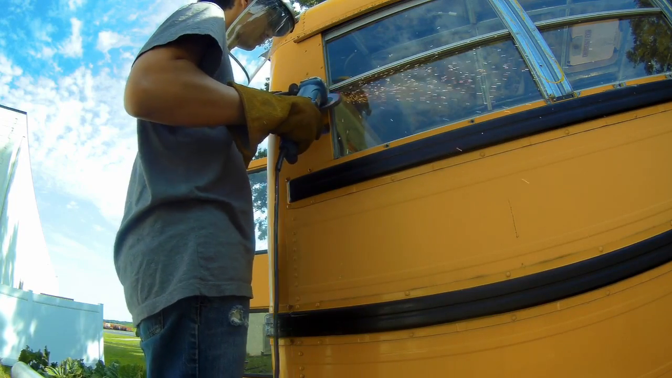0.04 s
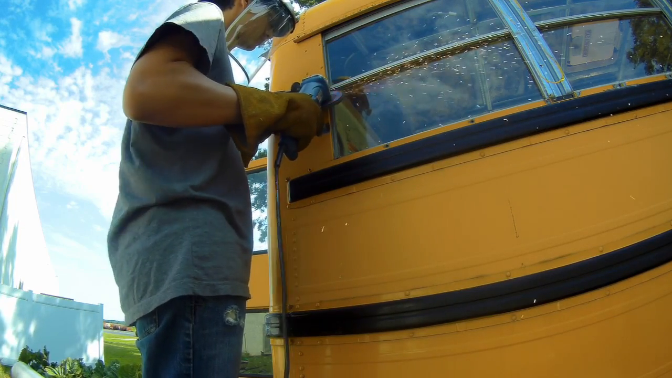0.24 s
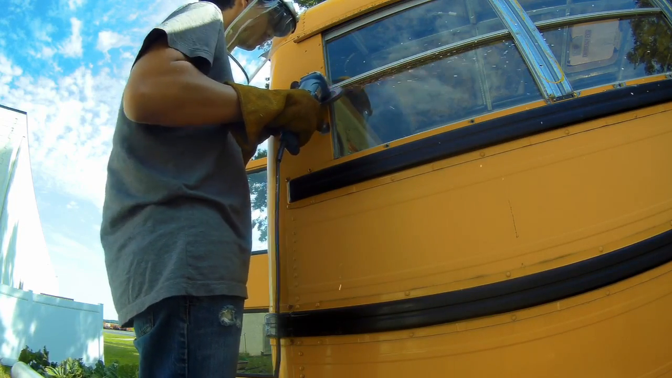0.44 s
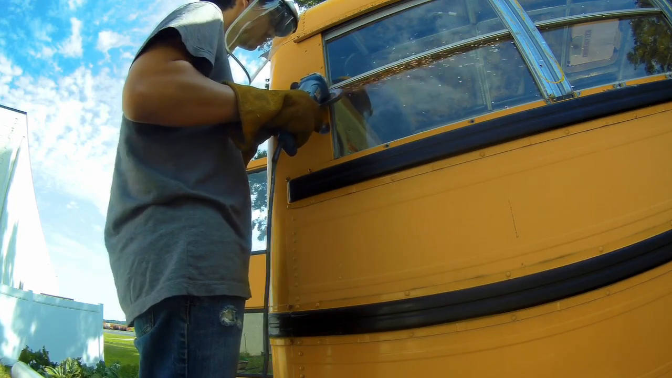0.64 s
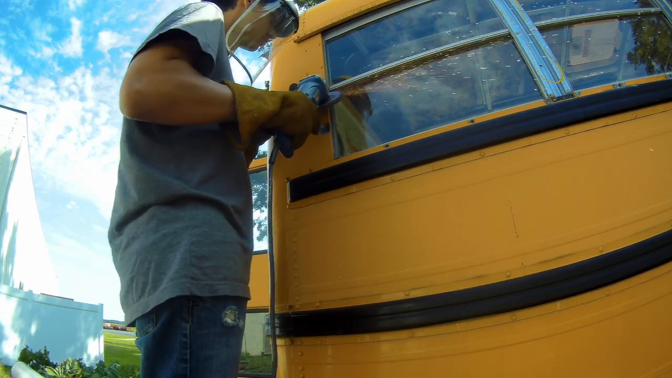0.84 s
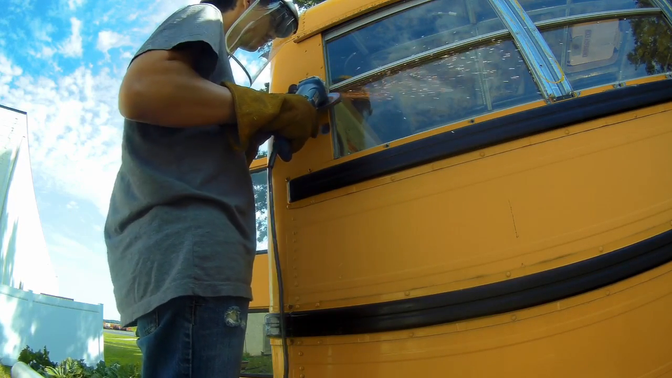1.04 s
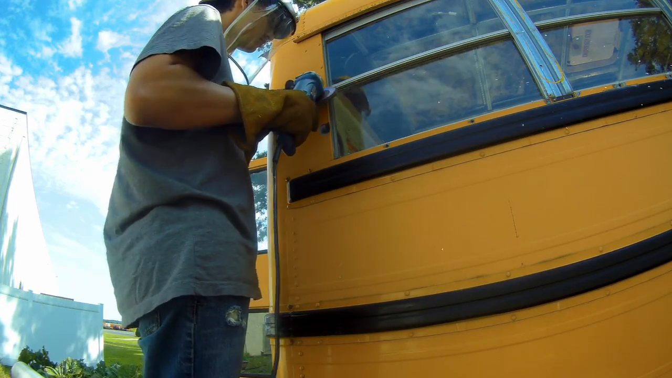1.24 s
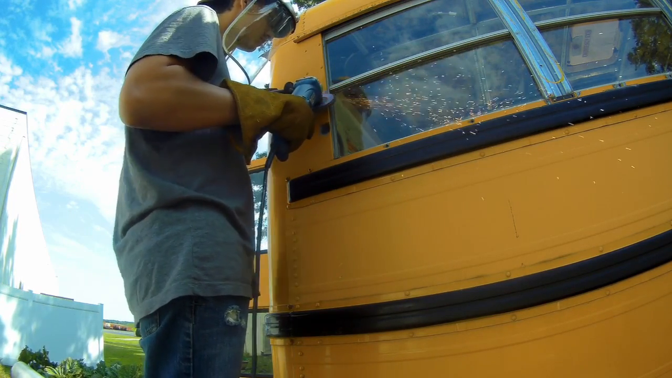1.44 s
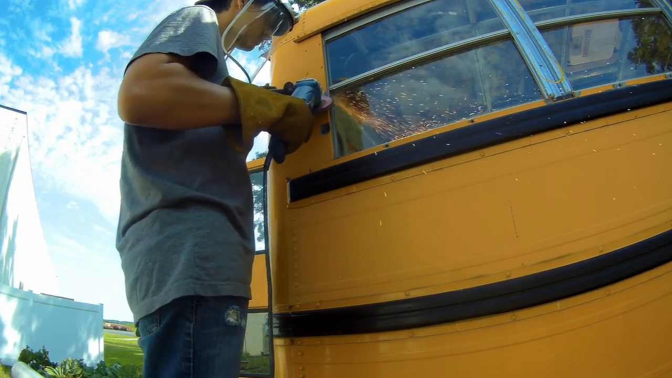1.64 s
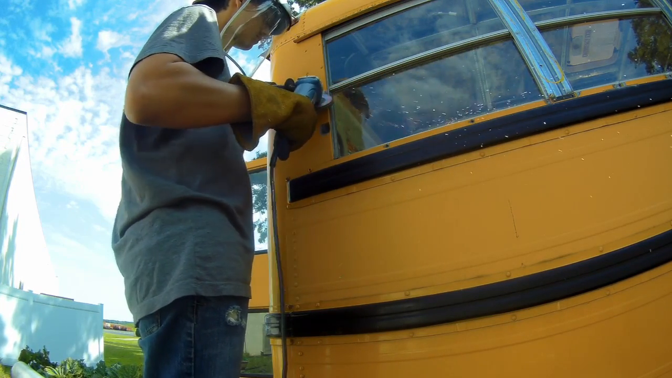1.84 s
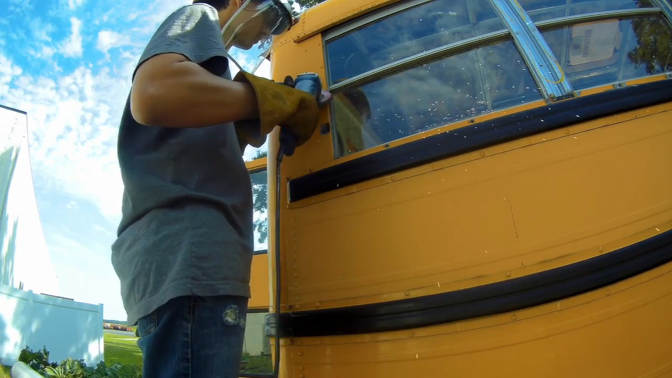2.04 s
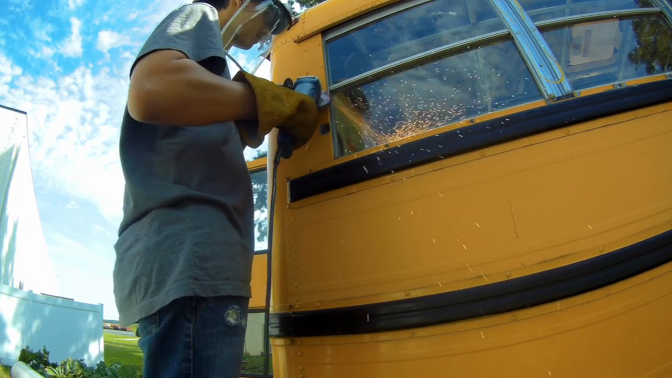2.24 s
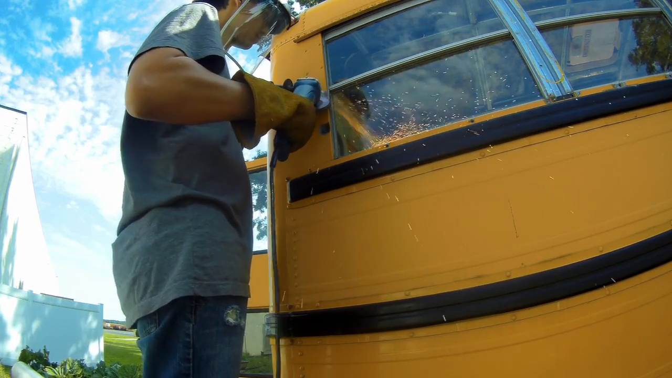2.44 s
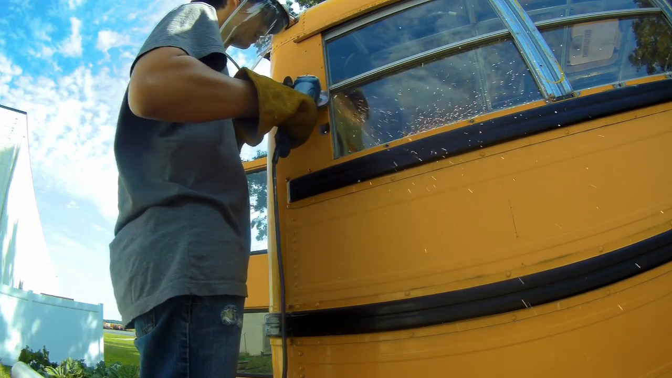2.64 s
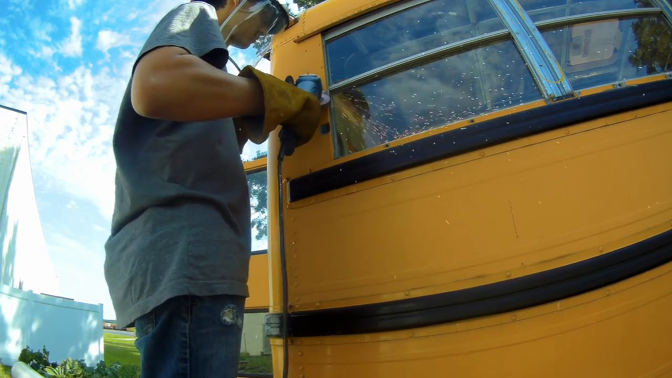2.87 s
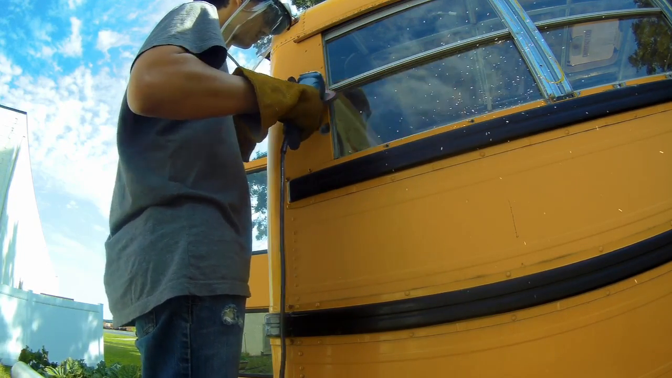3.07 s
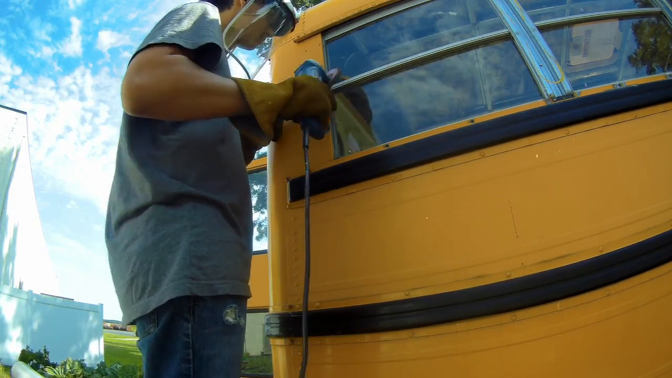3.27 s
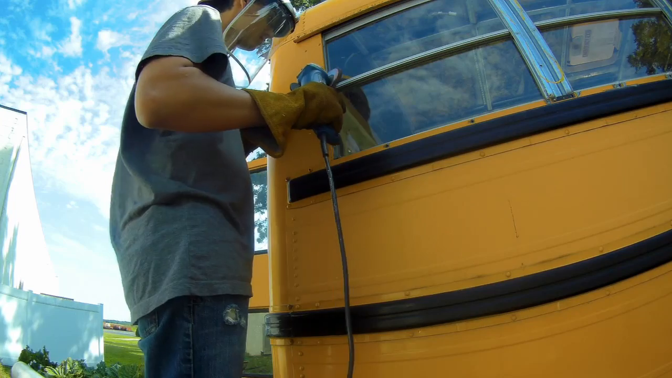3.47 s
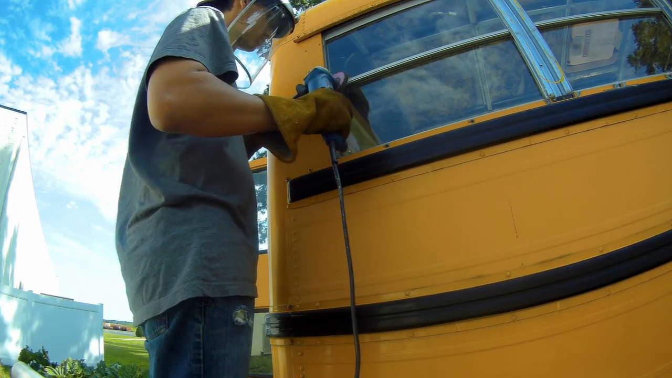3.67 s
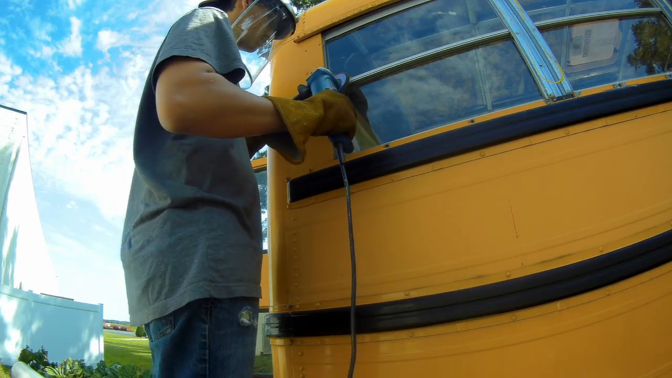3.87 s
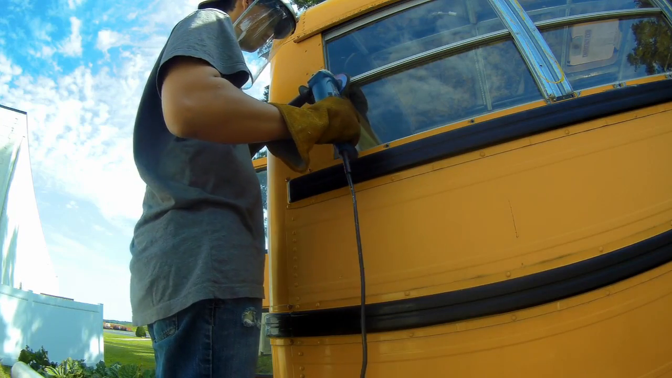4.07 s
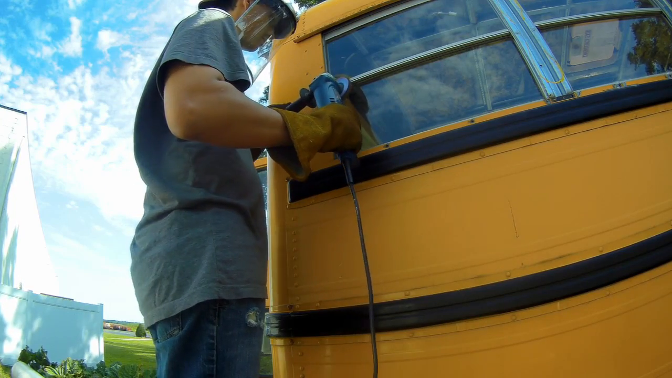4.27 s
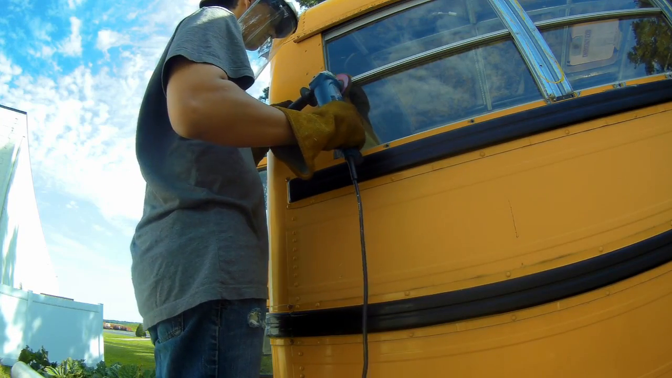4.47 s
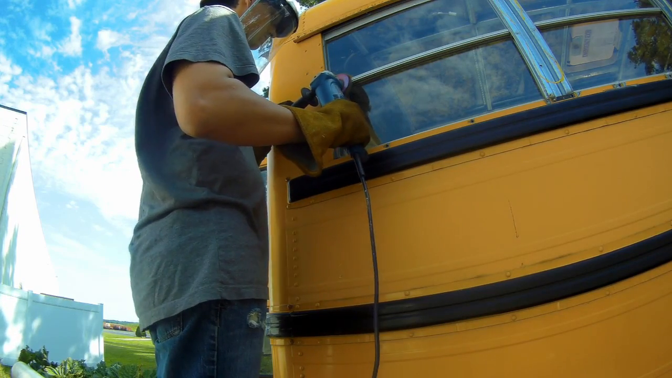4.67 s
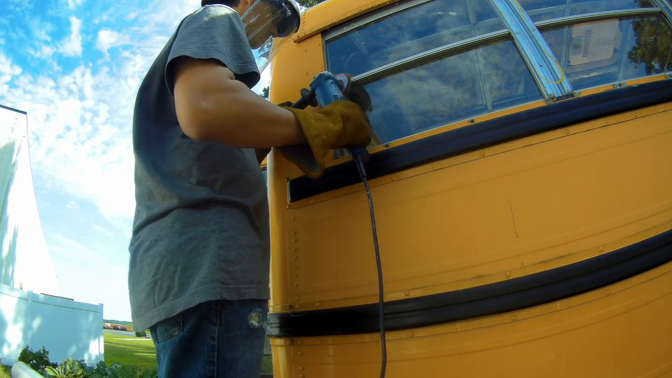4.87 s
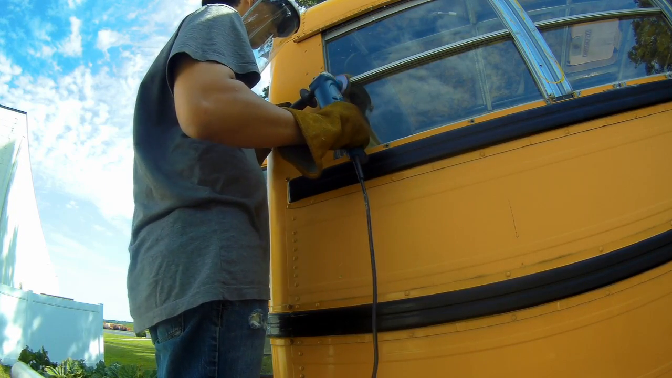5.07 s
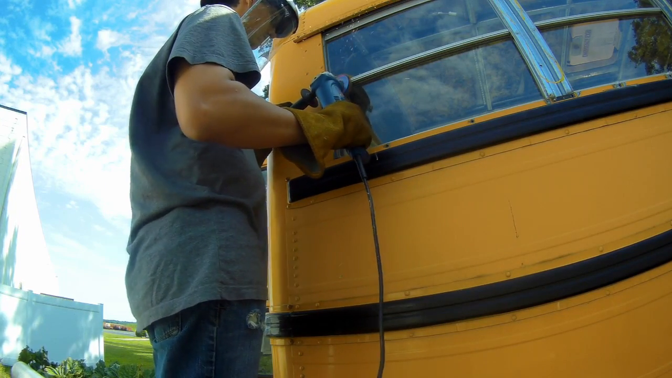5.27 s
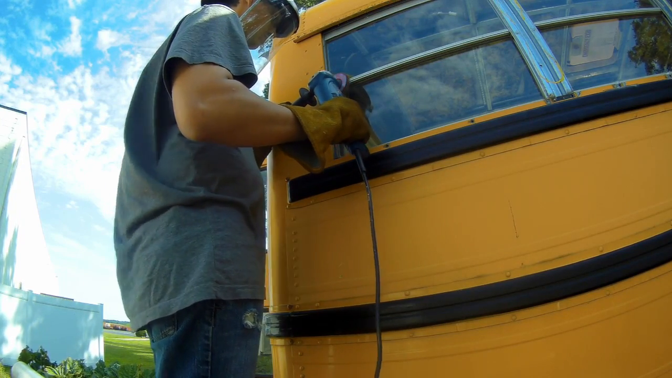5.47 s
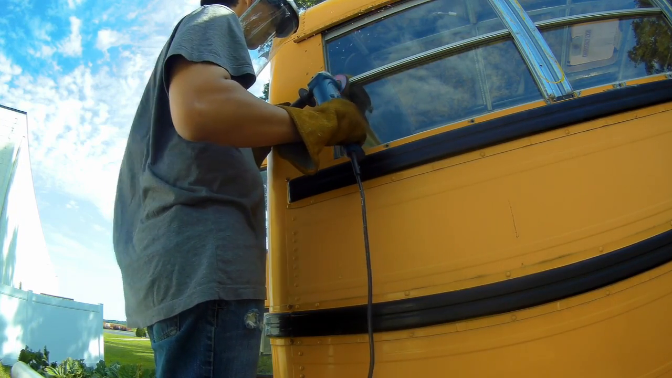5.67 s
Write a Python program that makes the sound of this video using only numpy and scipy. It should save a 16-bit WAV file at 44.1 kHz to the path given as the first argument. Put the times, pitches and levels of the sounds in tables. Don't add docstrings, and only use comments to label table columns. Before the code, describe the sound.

Outdoors, very close to a small microphone, an angle grinder is already cutting steel. From 0 to 3.1 s it makes a continuous harsh, high, sizzling grind, the motor dragged down at the start, with a rough whine and thin sheet-metal ring. The pressure flickers as edges catch, notably around 1.3, 2.1 and 2.4 s, with dull panel jolts underneath. At about 3.1 s the disc lifts and the noise drops sharply to a much quieter whir: the motor climbs in pitch, vents hiss and loose gears clack. From 3.9 to 4.5 s the disc skips on metal in short rasping bounces roughly a tenth of a second apart. Stronger scrapes follow at 4.7 s, then a longer push from 4.9 to 5.15 s with heavy thuds and sagging pitch. Brief strokes at 5.2 and 5.3 s lead to a final grind from 5.5 s to the end. A faint machine hums far off. Dry, centred, slightly overloaded sound.

```python
import sys
import numpy as np
from scipy import signal
from scipy.fft import rfft, irfft, next_fast_len
from scipy.io import wavfile
from scipy.ndimage import uniform_filter1d, map_coordinates

SR = 44100
rng = np.random.default_rng(int(sys.argv[2]) if len(sys.argv) > 2 else 0)


def waveform_to_disk(signal):
    frames = np.transpose(np.atleast_2d(signal))
    scaled = np.clip(frames, -1, 1) * 32767
    samples = np.round(scaled).astype(np.int16)
    wavfile.write(sys.argv[1], SR, samples)


def rack_gain(trim_db):
    fader = np.asarray(trim_db, float)
    return 10 ** (fader / 20)


N = 251811

GRIT_SPECTRUM = [(4500, -34.5), (7400, -17), (8050, -14.5), (8900, 0), (9500, 2), (10200, -6.5),
                 (10800, -13.5), (11500, -15.5), (12500, -27), (16200, -40.5)]
FIZZ_SPECTRUM = [(9000, -22), (11500, -6.5), (13000, -2), (14500, 1), (15600, 3.5), (18000, 1)]
FIRST_PANEL_SPECTRUM = [(2400, -24.5), (3100, -27.5), (3500, -13.5), (3720, -.5), (3950, -13.5),
                        (4400, -15), (5100, -17), (5800, -7.5), (6400, -1), (7400, 2.5), (8000, -6.5),
                        (10400, -38.5), (17000, -94)]
NEXT_PANEL_SPECTRUM = [(1760, -44.5), (3000, -23), (3490, -6), (4130, -6.5), (4620, -4.5), (5900, -1.5),
                       (6330, 4.5), (8000, -5.5), (10400, -23.5), (17600, -120)]
AIR_SPECTRUM = [(150, -38.5), (400, -18.5), (700, -4), (1400, -5), (2300, 0), (3000, -9), (3700, -0.5),
                (5000, -7.5), (6500, -1), (8000, -5.5), (9300, -2.5), (11000, -7.5), (16000, -20)]
SHAKE_SPECTRUM = [(15, -1), (40, -6.5), (100, -7), (300, 1), (600, 0), (1500, -5), (4000, -23)]
CLACK_SPECTRUM = [(2500, -31), (3700, -3), (4800, -7.5), (6500, 0), (8000, -2), (9300, -4.5), (11000, -11),
                  (16000, -27)]
THUD_SPECTRUM = [(20, -5), (60, -2), (130, -3), (300, -3), (700, -16), (2000, -65)]

# (frequency [Hz], level [dB rms])
HUM = [(70.0, -86.5)]
# (multiple of disc speed, level [dB re sixth order])
OTHER_ORDERS = [(2, -18.5), (4, -6), (5, -5), (7, -6), (8, -5), (9, -1.5), (10, -1)]
# (multiple of disc speed, level [dB], body note [Hz], half width [Hz], loss at full load [dB])
BODY_NOTES = [
    (1, -74, 149, 4.2, 4),
    (3, -73.5, 367, 41, 5),
    (6, -72, 868, 60, -1),
]
# (time [s], speed [turns/s])
SPEED = [(0.0, 120), (0.09, 110), (0.21, 99.7), (0.5, 98.5), (0.85, 100.3), (1.1, 98.8), (1.38, 96.3),
         (1.67, 92.4), (1.94, 95.5), (2.49, 95.7), (2.99, 100), (3.12, 101), (4.63, 95.3), (4.78, 95),
         (5.06, 84.5), (5.44, 74.5), (5.58, 76), (5.71, 70.6)]
# (time [s], drag [turns/s])
PUSHES = [(0.44, 2.64), (1.0, 2.25), (1.269, 9.9), (1.51, 8.95), (1.802, 5.2), (2.06, 6.4), (2.34, 8.5),
          (2.6, 9.4), (2.84, 4.8), (3.11, 5.4), (4.48, 3.5)]
# (time of full pressure [s], held [s], cut level [dB], fall-off [dB/s])
CONTACTS = [(0.0, 3.12, -42.5, 699), (3.946, .01, -43, 232), (4.049, 0.016, -43.5, 245),
            (4.151, 0.038, -42.5, 350), (4.25, 0.018, -40, 205), (4.322, 0.022, -40.5, 141),
            (4.428, .015, -38, 477), (4.659, 0.014, -38.5, 152), (4.758, .1, -40.5, 107),
            (4.881, 0.27, -40, 91), (5.225, 0.062, -44.5, 100), (5.299, .11, -40.5, 90),
            (5.545, 0.26, -38.5, 105)]
# (time [s], level [dB])
BITES = [(0.21, 1.5), (0.281, 3), (0.57, 4), (0.68, -1), (0.76, 0.5), (0.97, 4), (1.109, 1), (1.281, 5.5),
         (1.471, 2), (1.59, 2.5), (1.69, 2.5), (1.76, 1), (1.839, 4), (1.95, 0), (2.081, 7), (2.371, 6),
         (2.63, 0.5), (2.9, -1), (3.111, 2.5), (5.0, -2.5), (5.36, -2.5)]
# (time [s], level [dB])
LEANS = [(0.229, -1.5), (.5, 0.5), (0.719, -0.5), (1.03, -1.5), (1.201, -3.5), (1.33, -2), (1.5, -2.5),
         (1.85, 1), (2.14, -2.5), (2.32, -2.5), (2.43, -2), (3.0, 1), (3.08, 2.5), (5.0, 1.5)]
# (time [s], motor load [0-1], share of grit repeating each turn [0-1])
EFFORT = [(0, 0.9, 0.5), (1.4, 1, .3), (2.6, 0.94, 0.5), (3.1, 0.97, .6), (3.15, 0.03, .6), (4.33, 0, 0.5),
          (4.4, 0.41, 0.78), (4.65, .3, .4), (4.8, 0.74, .8), (5.07, .88, 1), (5.3, 0.5, .95),
          (5.5, 0.2, 0.72), (5.6, 0.6, 0.7), (5.71, 0.79, 1)]
# (time [s], level [dB])
SHUDDERS = [
    (1.28, -80),
    (1.85, -78),
    (1.97, -81),
    (2.089, -76),
    (3.08, -79.5),
    (4.87, -82),
    (4.95, -74),
    (5.07, -76),
    (5.62, -79),
    (5.69, -83),
]

LIFT_S, RUN_UP_HZ, RUN_UP_S = 3.125, 54.01, .35
MOVE_S = 3.5
PUSH_HALF_S, LEAN_S, SHUDDER_S = .13, .03, .062
TOUCH_DB_PER_S, SPINNING_DB = 525, -59.5
CATCH_S, SLACK, RECOVER_S = .014, .6, .04
FIZZ_DB, RING_DB = (-0.5, -3), (-10.5, -8.5)
FEELS_BITE, FEELS_LEAN = .3, .5
FREE_RING_DB = 9.5
FIZZ_WEAR_DB_PER_S = 1.07
BARS_PER_TURN, TEETH = 105, 38
MAINS_HZ = 120
WHINE_DB, GEAR_DB, SHAKE_DB = (-31.5, 23.5), (-93, 23), (-93, 10.5)
AIR_DB, AIR_GROWS, TURNED_DB = -63, 1.5, 4
HOUSING_HZ, HOUSING_HALF_HZ = 3850, 800
RIVET_HZ, RIVET_HALF_HZ, RIVET_BOOST_DB = 9700, 1000, 6.5
GRIPPED = 0.29
OFF_NOTE = 0.047
BRAKING_DB, BRAKING_S = 16, .14
RATTLE_DB, RATTLE_SCATTER_DB, RATTLE_SHARP, SETTLE_DB_PER_S, CLAMP_DB = -56, 3, 3.8, 4.5, 25


def unit(x):
    return x / np.sqrt(np.mean(x ** 2) + 1e-20)


def curves(rows):
    s, *cols = np.transpose(rows)
    return [np.interp(np.arange(N) / SR, s, c) for c in cols]


def slowly(rule):
    t = np.arange(0, N / SR + .002, .001)
    return [np.interp(np.arange(N) / SR, t, c) for c in np.atleast_2d(rule(t))]


def wobble(rate):
    every = np.arange(0, N + 16, 16)
    knots = rng.standard_normal(int(N * rate / SR) + 4)
    return np.interp(np.arange(N), every, map_coordinates(knots, [every * rate / SR]))


def coloured(x, spectrum):
    m = next_fast_len(N + 8192)
    f, db = np.transpose(spectrum)
    gain = rack_gain(np.interp(np.log(np.fft.rfftfreq(m, 1 / SR) + 1), np.log(f + 1), db))
    return unit(irfft(rfft(x, m) * gain, m)[:N])


def patchy(x, depth_db):
    z = signal.stft(x, nperseg=512)[2]
    field = uniform_filter1d(rng.standard_normal(z.shape), size=6, axis=0)
    field = uniform_filter1d(field, size=6, axis=1)
    return signal.istft(z * rack_gain(depth_db * unit(field)), nperseg=512)[1][:N]


def tone(turns, multiple, blur, rate):
    return np.sqrt(2) * np.sin(2 * np.pi * multiple * turns + blur * wobble(rate))


def resonance(hz, centre, half):
    return 1 / (1 + ((hz - centre) / half) ** 2)


def lifted(t, over_s):
    return 1 - np.exp(-np.maximum(t - LIFT_S, 0) / over_s)


def speed_change(t):
    drag = sum(hz * np.cos(np.pi / 2 * np.clip((t - s) / PUSH_HALF_S, -1, 1)) ** 2 for s, hz in PUSHES)
    return RUN_UP_HZ * lifted(t, RUN_UP_S) - drag


def disc_turns():
    change, = slowly(speed_change)
    return np.cumsum(curves(SPEED)[0] + change) / SR


def rim(turns, share, memory):
    grains = 360
    fresh = rng.standard_normal((900, grains))
    grit = signal.lfilter([1], [1, -np.clip(memory, 0, .98)], fresh, axis=0)
    fine = signal.resample(grit.ravel(), 4 * grit.size)
    kept = unit(np.interp((turns + 20) * 4 * grains, np.arange(fine.size), fine))
    share = np.clip(share, 0, 1)
    return np.sqrt(share) * kept + np.sqrt(1 - share) * rng.standard_normal(N)


def surroundings(load):
    shake_db = SHAKE_DB[0] + SHAKE_DB[1] * load
    rumble_db = shake_db + 9.5 + 1.3 * wobble(9.8) + 1.5 * wobble(30)
    rumble = rack_gain(rumble_db) * coloured(rng.standard_normal(N), SHAKE_SPECTRUM)
    t = np.arange(N) / SR
    hum = sum(rack_gain(db + 1.5 * wobble(2.1)) * tone(t, hz, blur=0.29, rate=6.6) for hz, db in HUM)
    return rumble + hum


def shudder_swell(t):
    return sum(rack_gain(db) * np.exp(-((t - s) / SHUDDER_S) ** 2 / 2) for s, db in SHUDDERS)


def jolts():
    swell, = slowly(shudder_swell)
    return swell * coloured(rng.standard_normal(N), THUD_SPECTRUM)


def cooling_air(turns, speed):
    air_db = AIR_DB + AIR_GROWS * 20 * np.log10(speed / speed.max())
    air_db = air_db + TURNED_DB * lifted(np.arange(N) / SR, 0.024) + 6.5 + 0.52 * wobble(12)
    return rack_gain(air_db) * coloured(patchy(rim(turns, 0.31, memory=0.71), depth_db=1.02), AIR_SPECTRUM)


def gear_teeth(turns, speed, load):
    t = np.arange(N) / SR
    gear_db = GEAR_DB[0] + GEAR_DB[1] * load + BRAKING_DB * np.exp(-t / BRAKING_S)
    ripple = 1 + .6 * np.cos(2 * np.pi * MAINS_HZ * t)
    ripple = ripple * resonance(TEETH * speed, HOUSING_HZ, HOUSING_HALF_HZ)
    return rack_gain(gear_db + 1.6 * wobble(60)) * ripple * tone(turns, TEETH, blur=.6, rate=110)


def shaft_orders(turns, speed, load):
    grip = np.minimum(load / GRIPPED, 1)
    orders = []
    for k, db, hz, half, loss_db in BODY_NOTES:
        swell_db = 10 * np.log10(OFF_NOTE + resonance(k * speed, hz, half))
        orders.append((k, db - loss_db * grip + swell_db))
    sixth_db = orders[-1][1]
    orders += [(k, sixth_db + db + 1.7 * wobble(5.3)) for k, db in OTHER_ORDERS]
    freed = 0.28 + 0.63 * lifted(np.arange(N) / SR, 0.082)
    return freed * sum(rack_gain(db) * tone(turns, round(k), blur=0.38, rate=15) for k, db in orders)


def motor(turns, load):
    speed = SR * np.gradient(turns)
    air = cooling_air(turns, speed)
    return air + gear_teeth(turns, speed, load) + shaft_orders(turns, speed, load)


def rattle(turns, load):
    t = np.arange(N) / SR
    size_db = RATTLE_SCATTER_DB * rng.standard_normal(900)[np.round(turns).astype(int)]
    gate = rack_gain(size_db) * np.exp(RATTLE_SHARP * (np.cos(2 * np.pi * turns) - 1))
    level_db = RATTLE_DB - SETTLE_DB_PER_S * np.maximum(t - LIFT_S, 0) - CLAMP_DB * load
    return rack_gain(level_db) * lifted(t, 0.048) * coloured(gate * rng.standard_normal(N), CLACK_SPECTRUM)


def bites(t):
    bite_db = 0
    for s, db in BITES:
        before = t < s
        fade = np.exp(-np.abs(t - s) / np.where(before, CATCH_S, RECOVER_S))
        bite_db = bite_db + db * np.where(before, 1, -SLACK) * fade
    return uniform_filter1d(bite_db, size=9)


def pressure(t):
    touch = 0
    for s, hold, db, fall in CONTACTS:
        level_db = db - TOUCH_DB_PER_S * np.maximum(s - t, 0) - fall * np.maximum(t - s - hold, 0)
        touch = touch + rack_gain(level_db) ** 2
    whirr = rack_gain(SPINNING_DB) ** 2
    bite_db = bites(t)
    lean_db = sum(db * np.exp(-((t - s) / LEAN_S) ** 2 / 2) for s, db in LEANS)
    rivet = (t > MOVE_S).astype(int)
    spared_db = (FEELS_BITE - 1) * bite_db + (FEELS_LEAN - 1) * lean_db
    cut_db = 10 * np.log10(touch + whirr) + lean_db + bite_db
    fizz_db = np.take(FIZZ_DB, rivet) + spared_db - FIZZ_WEAR_DB_PER_S * t * (1 - rivet)
    ring_db = np.take(RING_DB, rivet) + spared_db + FREE_RING_DB * whirr / (whirr + touch)
    return cut_db, fizz_db, ring_db


def commutator_whine(turns, load):
    bars_hz = BARS_PER_TURN * SR * np.gradient(turns)
    whine_db = WHINE_DB[0] + WHINE_DB[1] * load
    whine_db = whine_db + RIVET_BOOST_DB * resonance(bars_hz, RIVET_HZ, RIVET_HALF_HZ)
    return rack_gain(whine_db + 1.8 * wobble(45)) * tone(turns, BARS_PER_TURN, blur=1.35, rate=300)


def cutting(turns, load, share):
    cut_db, fizz_db, ring_db = slowly(pressure)
    run_out = 1 + 0.094 * np.cos(2 * np.pi * turns)
    press = rack_gain(0.33 * wobble(24.805) + 0.46 * wobble(300)) * run_out
    grit = patchy(press * rim(turns, share, memory=0.92), depth_db=1.0)
    on_first = np.arange(N) < MOVE_S * SR
    ring = np.where(on_first, coloured(grit, FIRST_PANEL_SPECTRUM), coloured(grit, NEXT_PANEL_SPECTRUM))
    fizz = rack_gain(fizz_db + 1.0 * wobble(10)) * coloured(grit, FIZZ_SPECTRUM)
    layers = coloured(grit, GRIT_SPECTRUM) + fizz + rack_gain(ring_db) * ring
    return rack_gain(cut_db - 3.0) * (layers + commutator_whine(turns, load))


def scene():
    load, share = curves(EFFORT)
    turns = disc_turns()
    mono = surroundings(load) + jolts()
    mono = mono + motor(turns, load) + rattle(turns, load) + cutting(turns, load, share)
    return np.array([mono, mono])


def top_cut(x):
    return signal.sosfilt(signal.butter(12, 16990, fs=SR, output="sos"), x)


def record(dry):
    peak, top_hz = .036, 15880
    rounded = dry[0] / (1 + np.abs(dry[0] / peak) ** 4) ** (1 / 4)
    m = next_fast_len(N)
    kept = irfft(rfft(rounded, m) * (np.fft.rfftfreq(m, 1 / SR) < top_hz), m)[:N]
    mix = np.array([kept, kept])
    return top_cut(mix)


dry = scene()
out = record(dry)
waveform_to_disk(out)
```